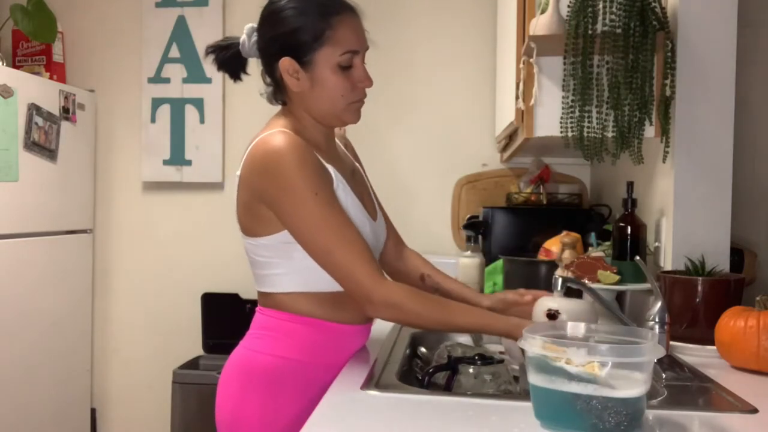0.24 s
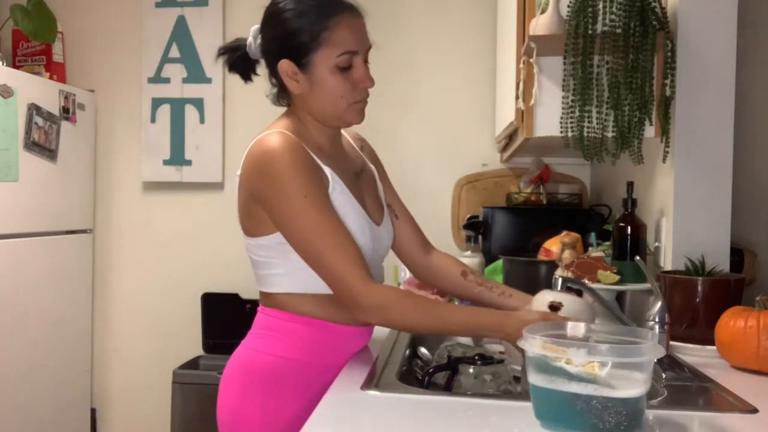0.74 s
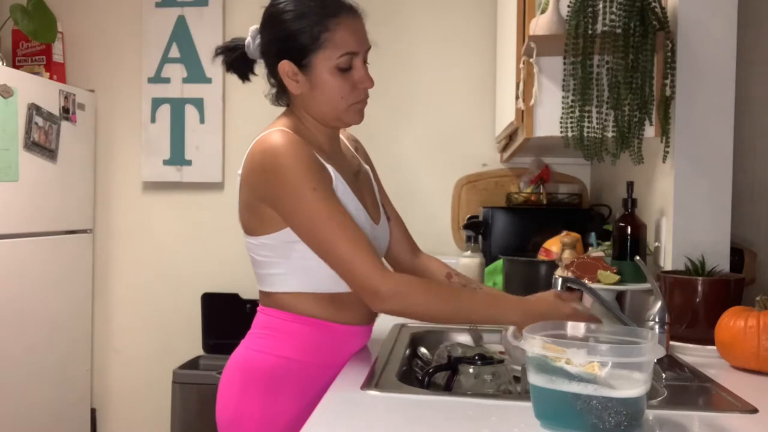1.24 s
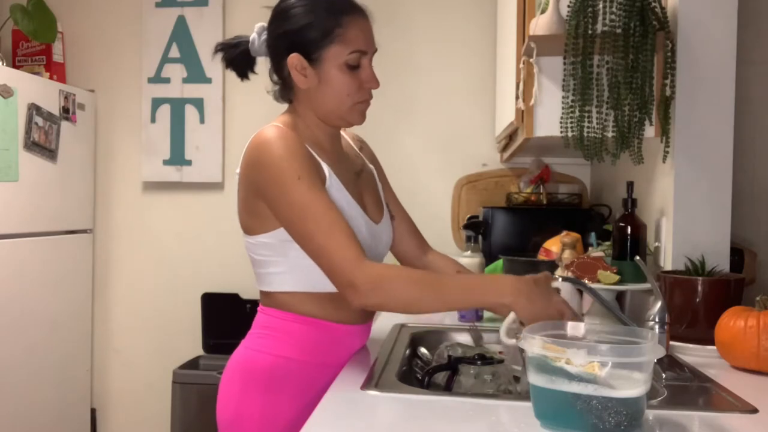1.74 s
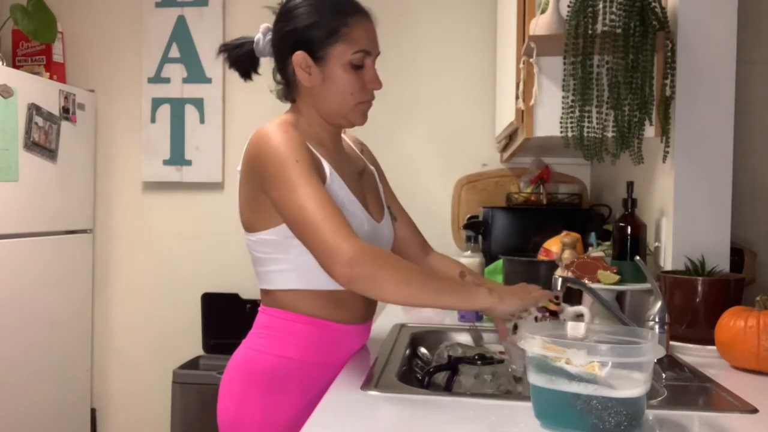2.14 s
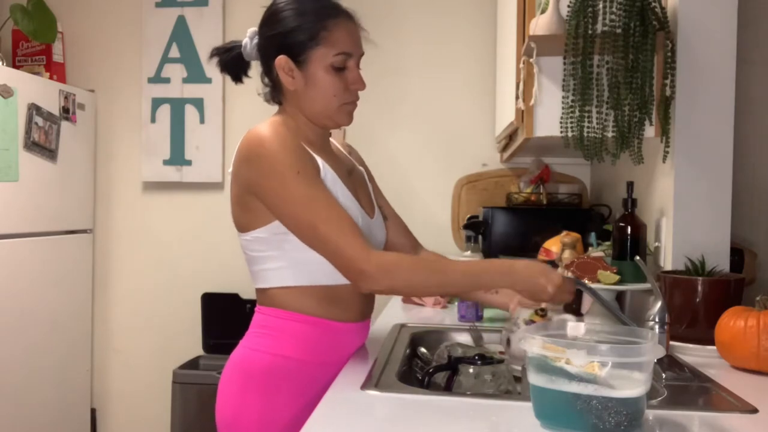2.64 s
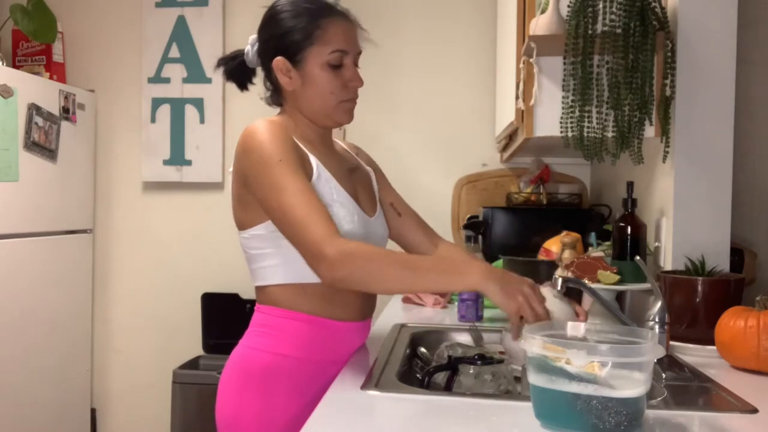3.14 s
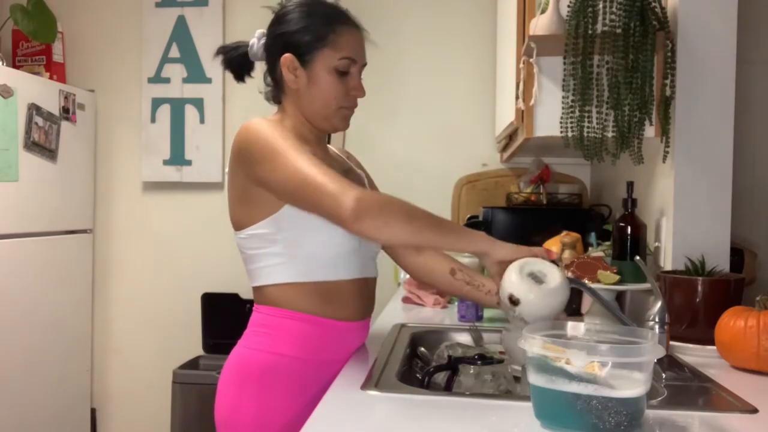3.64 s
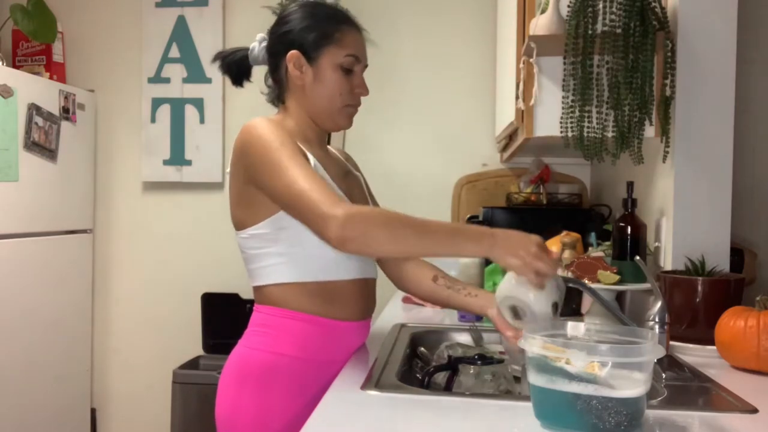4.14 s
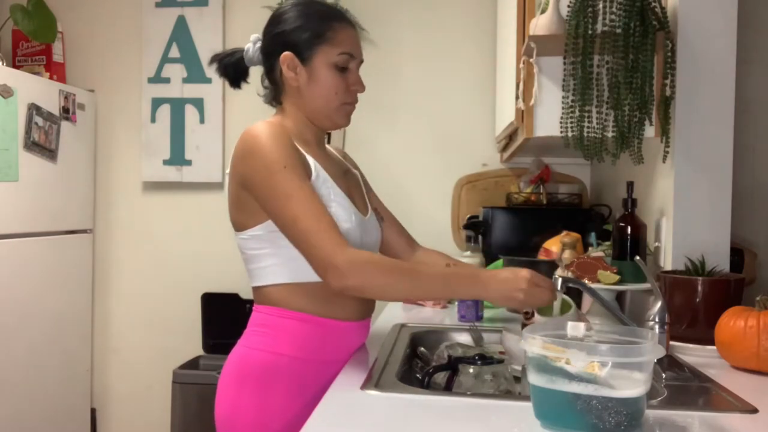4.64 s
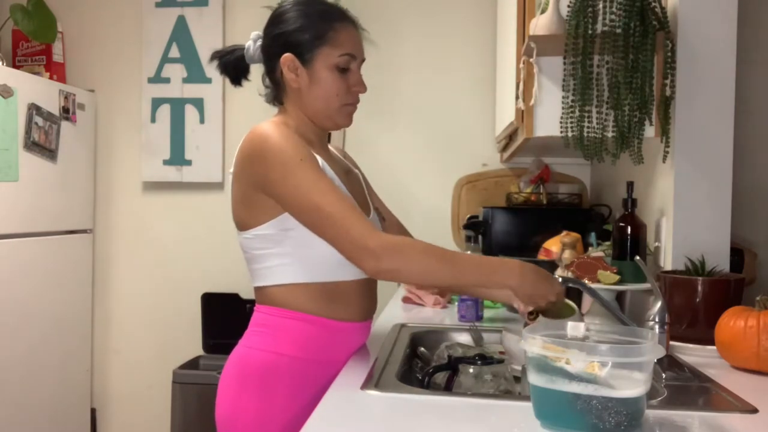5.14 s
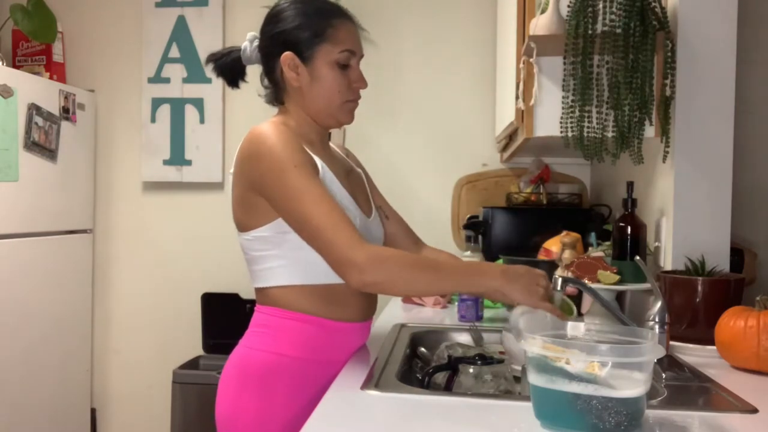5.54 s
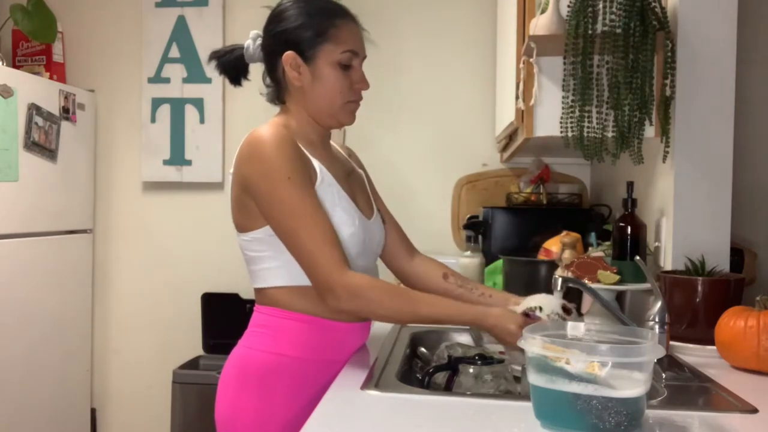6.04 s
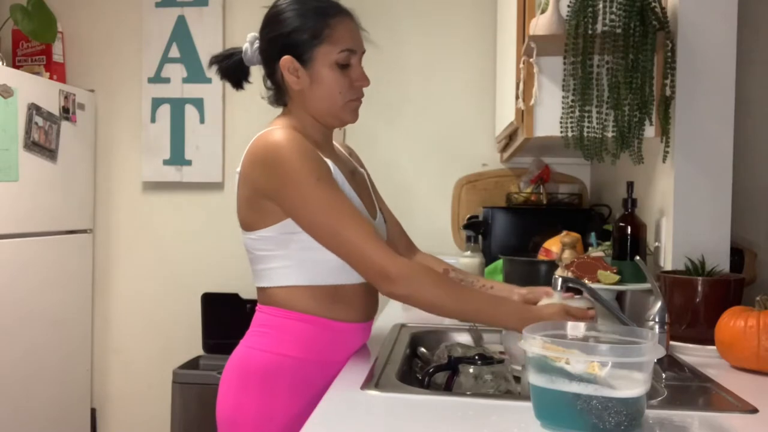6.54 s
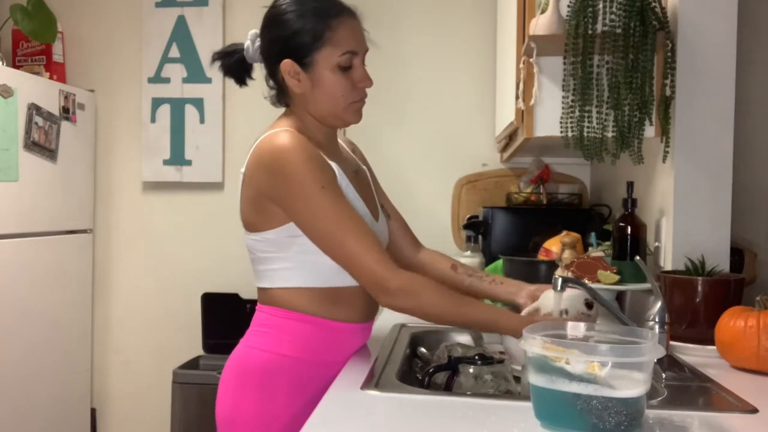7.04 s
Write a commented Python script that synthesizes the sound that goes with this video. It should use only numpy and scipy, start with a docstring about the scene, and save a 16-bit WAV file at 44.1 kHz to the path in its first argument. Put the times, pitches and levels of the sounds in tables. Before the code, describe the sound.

A small kitchen with short, diffuse echoes, heard in stereo from a metre or two, the sink slightly right. A thin, quiet tap hiss runs throughout. At 0 s a dish clink is already ringing with a water slosh; a strong clang of plate, glass and steel basin comes at 0.4 s. Until about 3 s, irregular damped clinks of plate, bowl, mug and glass mix with bright cutlery ticks, hollow basin knocks and deep cabinet thumps, with a dense bright cluster near 1.7, a splash near 2.1 and hard knocks around 2.4-2.7. From 3 to 4.6 s there is a lull: hiss, tiny rising drip notes, soft wet rubs and very faint knocks. A firm knock and clink at 4.7 restart sparser activity, with clusters near 5.0-5.3 and 5.8-6.0, where water sloshes again. Then mostly isolated dull knocks at 6.3, 6.8 and 7.0, and a last drip.

```python
"""Crockery is rinsed by hand in a steel kitchen sink, to the right of a phone a metre or two away.
From the start plate, bowl, mug, glass and cutlery ring as sums of decaying modes under gritty contacts,
knocks excite basin and cabinet modes, water sloshes as uneven noise and bubbles, and a thin tap hisses.
Past three seconds a lull brings dripping bubble notes and soft rubs; then sparser clinks and knocks resume.
Direct sound and diffuse echoes smear each blow for about a third of a second in the small kitchen."""
import sys
import numpy as np
from scipy import signal
from scipy.fft import rfft, irfft, next_fast_len
from scipy.io import wavfile
from scipy.ndimage import uniform_filter1d

SR = 44100
rng = np.random.default_rng(int(sys.argv[2]) if len(sys.argv) > 2 else 0)


def natural_amplitude(level_db):
    """Convert a level in decibels to a linear amplitude factor, elementwise."""
    exponent = np.asarray(level_db, float) / 20
    return 10 ** exponent


def inscribe(sig):
    """Save sig as 16-bit PCM at rate SR to the path in sys.argv[1].

    A 1-D sig is mono; a 2-D sig holds one channel per row.
    Samples are clipped to [-1, 1] before scaling.
    """
    pcm = np.round(np.clip(np.atleast_2d(sig).T, -1, 1) * 32767)
    wavfile.write(sys.argv[1], SR, pcm.astype(np.int16))


N = 321489  # samples in the scene
SPAN = 32768  # samples in the spectrum of one blow

# modes of the wooden cabinet under the basin: (frequency [Hz], relative level [dB], t60 [s])
CABINET_MODES = [(55, -38.5, 0.81), (70.8, -11.5, 0.72), (73, -28, 0.087), (103.3, -5.5, 0.21),
                 (125.4, -15, 0.86), (170.3, 0.5, 0.11), (194, -1.5, 0.095), (242.6, 4, 0.11),
                 (267, -6, 0.13), (341, -14, 0.22)]


def level(x, db):
    """Root-mean-square scaling: brings a signal to a given rms level."""
    return x * natural_amplitude(db) / np.sqrt(np.mean(x ** 2))


def band(x, hz, width):
    """Second-order resonance: a gentle band-pass with gain 1 at its centre."""
    return signal.lfilter(*signal.iirpeak(hz, hz / width, fs=SR), x)


def walk(rate):
    """Slow random modulation: chance values at a given rate, smoothed by a moving average, rms 1."""
    k = int(SR / rate)
    steps = np.repeat(rng.standard_normal(N // k + 1), k)
    return level(uniform_filter1d(steps, k)[:N], 0)


def hertz(size):
    """Frequency axis of a real spectrum, shifted 1 Hz to keep clear of zero."""
    return np.arange(size // 2 + 1) * SR / size + 1


def favour(hz, width):
    """Resonance response: complex gain of a broad resonance, 1 near its centre."""
    f = hertz(SPAN)
    return 1 / (1 + 1j * (f / hz - hz / f) * hz / width)


def decay(t, t60):
    """Exponential damping: the amplitude falls 60 dB in t60."""
    return np.exp(-np.log(1000) * t / t60)


def ring(modes, rise_s=1e-5):
    """Modal superposition: spectrum of a struck object's free decay, whose waveform peaks at 1."""
    t = np.arange(SPAN // 2) / SR
    y = sum(natural_amplitude(db) * np.sin(2 * np.pi * hz * t) * decay(t, t60) for hz, db, t60 in modes)
    y = y * (1 - np.exp(-t / rise_s)) ** 2
    return rfft(y / np.abs(y).max(), SPAN)


def contact(chatter_s, clean_s):
    """Excitation force: a sudden touch, then gritty rubbing that takes more of the energy the longer it is."""
    t = np.arange(SPAN // 4) / SR
    chatter_s = max(chatter_s, 1e-3)
    grit = rng.standard_normal(len(t)) * natural_amplitude(1.42 * rng.exponential(size=len(t)))
    push = grit * np.exp(-t / chatter_s)
    rub_share = chatter_s / (chatter_s + clean_s)  # of the energy
    push *= np.sqrt(rub_share / np.sum(push ** 2))
    push[0] = np.sqrt(1 - rub_share)
    return rfft(push, SPAN)


def add(track, s, x):
    """Linear superposition at time s; a blow before zero is already ringing."""
    i = int(s * SR)
    x = x[:, max(-i, 0):N - i]
    track[:, max(i, 0):max(i, 0) + x.shape[1]] += x


def coloured(spectrum):
    """Spectral shaping: noise filtered to a (frequency [Hz], level [dB]) curve, rms 1."""
    hz, db = np.transpose(spectrum)
    size = next_fast_len(N)
    gain = natural_amplitude(np.interp(np.log(hertz(size)), np.log(hz), db))
    return level(irfft(rfft(rng.standard_normal(size)) * gain, size)[:N], 0)


def crockery():
    """Coupled impact: each clink excites the modes of both pieces, under a dry broadband clack."""
    # two pieces meet: (time [s], one piece, its level [dB], other piece, its level [dB], chatter [s])
    clinks = [(-0.006, "glass", -18.5, "plate", -13.5, 0.053), (0.1573, "mug", -24, "glass", -23.5, 0.085),
              (0.404, "plate", -13.5, "glass", -16.5, 0.014), (0.411, "mug", -16.5, "bowl", -29, 0.013),
              (0.5553, "glass", -17, "mug", -22.5, 0.0088), (0.5788, "glass", -28, "mug", -33.5, 0.0067),
              (0.684, "plate", -15, "glass", -22, 0.0075), (0.7111, "glass", -37, "plate", -43, 0.036),
              (0.897, "plate", -25, "glass", -34, 0.012), (1.097, "plate", -17.5, "glass", -27.5, 0.0043),
              (1.2624, "glass", -21.5, "bowl", -36, 0.0066), (1.3481, "glass", -20, "plate", -21.5, 0.028),
              (1.603, "plate", -17.5, "bowl", -22.5, 0.013), (1.6823, "plate", -20, "glass", -17, 0.078),
              (1.736, "bowl", -8, "plate", -17, 0.0093), (1.738, "glass", -14.5, "mug", -19.5, 0.0077),
              (1.757, "glass", -15, "mug", -21.5, 0.0076), (2.0374, "glass", -27.5, "mug", -45, 0.009),
              (2.0924, "glass", -19, "plate", -26, 0.0046), (2.332, "glass", -38, "plate", -36.5, 0.018),
              (2.3685, "glass", -29.5, "bowl", -35, 0.023), (2.4122, "glass", -31, "plate", -37, 0.0082),
              (2.461, "glass", -29.5, "plate", -30.5, 0.011), (2.602, "bowl", -16.5, "glass", -28, 0.0032),
              (2.7806, "glass", -24.5, "mug", -32.5, 0.015), (2.8434, "glass", -34, "mug", -47, 0.015),
              (2.9404, "glass", -38, "mug", -45, 0.017), (4.679, "plate", -25, "glass", -29, 0.041),
              (4.9134, "plate", -39, "bowl", -47.5, 0.0056), (5.053, "glass", -35.5, "mug", -43, 0.013),
              (5.28, "mug", -30.5, "glass", -32, 0.043), (5.337, "glass", -23.5, "mug", -34, 0.015),
              (5.8389, "plate", -26, "glass", -40, 0.0096), (5.972, "mug", -23.5, "glass", -33, 0.0034)]
    # modes of each piece: (frequency [Hz], relative level [dB], t60 [s])
    plate_modes = [(1760, -17, 0.044), (1792, 1, 0.035), (1824, -16, 0.18), (1857, -23, .15),
                   (1964, -30.5, 0.13), (2025, -12, 0.094)]
    bowl_modes = [(2430, 0, .22), (3790, -15, .14), (3980, -13, .1), (4780, -13, .13), (5520, -14, .12),
                  (6020, -11, .16), (12560, -11, .16)]
    mug_modes = [(1055, -14, .2), (2765, 0, .26), (4280, -8, .16), (7320, -20, .18), (11900, -14, .15)]
    glass_modes = [(2660, -4, .04), (2810, -4, .05), (2878, 0, .12), (2930, -3, .1), (2985, -3, .06),
                   (3080, -3, .06), (3200, -6, .04)]
    pieces = {"plate": plate_modes, "bowl": bowl_modes, "mug": mug_modes, "glass": glass_modes}
    # wet glaze cushions the touch, so the ring swells in
    rings = {name: ring(modes, rise_s=0.0007) for name, modes in pieces.items()}
    clack_db, clack_hz = 12.5, 2220  # over the ring of the first piece
    clack = natural_amplitude(clack_db) * favour(clack_hz, 1.1 * clack_hz) ** 2
    blows = []
    for s, one, db, other, other_db, chatter_s in clinks:
        pair = natural_amplitude(db) * (rings[one] + clack) + natural_amplitude(other_db) * rings[other]
        blows.append((s, contact(chatter_s, clean_s=0.06) * pair))
    return blows


def cutlery():
    """Modal selection: the spot struck favours some short steel modes, under a bright scratch and glint."""
    # ticks and scrapes: (time [s], level [dB], favoured frequency [Hz], chatter [s])
    ticks = [(-0.006, -12.5, 4670, 0.025), (0.16, -20, 3120, 0.051), (0.403, -22, 3540, 0.016),
             (0.5477, -21.5, 7600, 0.027), (0.685, -26.5, 4260, 0.021), (0.8964, -32.5, 4400, 0.014),
             (1.095, -26, 4710, 0.046), (1.26, -25.5, 4600, 0.012), (1.348, -23.5, 4170, 0.014),
             (1.6054, -23.5, 3740, 0.035), (1.684, -19.5, 4100, 0.033), (1.7336, -11.5, 5540, 0.008),
             (2.0342, -30.5, 4280, 0.013), (2.0919, -15, 2950, 0.021), (2.3336, -31, 5560, 0.018),
             (2.3685, -28, 5560, 0.024), (2.6035, -21, 4000, 0.0057), (2.7797, -26.5, 3440, 0.017),
             (4.6804, -37, 3830, 0.02), (5.2814, -30, 3140, 0.0098), (5.3288, -27.5, 4000, 0.025),
             (5.9609, -28.5, 4130, 0.0092)]
    # steel modes: (frequency [Hz], relative level [dB], t60 [s])
    steel_modes = [(3540, 10, 0.011), (3886, 9.5, 0.041), (4400, 12, 0.0043), (4557, 2, 0.016),
                   (4930, 5, 0.013), (5560, -47, 0.051), (6580, 11, 0.016), (7210, 6, 0.085)]
    steel = ring(steel_modes) + natural_amplitude(21) * favour(2000, 7100)  # ring and scratch
    glint = favour(11500, 7000) ** 2
    glint_db, glint_slope = -2, 0.29  # glint of a 0 dB tick; dB per dB of tick
    blows = []
    for s, db, hz, chatter_s in ticks:
        body = natural_amplitude(db) * (0.89 + 3 * favour(hz, 0.036 * hz)) * steel
        body = body + natural_amplitude(glint_db + glint_slope * db) * glint
        blows.append((s, contact(chatter_s, clean_s=0.0027) * body))
    return blows


def basin():
    """Modal selection: the spot struck favours some basin modes, while the cabinet below thumps."""
    # knocks: (time [s], ring level [dB], favoured frequency [Hz], thump level [dB], chatter [s])
    knocks = [(-0.006, -17.5, 1300, -29.5, 0.024), (0.159, -21, 1300, -41, 0.024),
              (0.404, 1.5, 436, -19.5, 0.026), (0.41, -12.5, 1500, -24, 0.037),
              (0.474, -13, 1080, -24.5, 0.0079), (0.601, -22.5, 1060, -34, 0.0087),
              (1.261, -33, 1260, -62, 0.046), (1.586, -19, 444, -18, 0.035),
              (1.698, -21, 1050, -22.5, 0.017), (1.741, -15, 970, -36, 0.024),
              (2.035, -26, 1090, -56, 0.018), (2.09, -31, 1060, -28.5, 0.056),
              (2.207, -21.5, 990, -38, 0.005), (2.338, -29, 1230, -60, 0.06), (2.416, -12, 610, -26, 0.011),
              (2.461, -13.5, 912, -26.5, 0.0059), (2.659, -6, 860, -58, 0.009),
              (2.68, -9.5, 825, -23, 0.012), (2.789, -23, 930, -39, 0.065), (2.942, -41, 450, -36, 0.014),
              (4.267, -41, 659, -39.5, 0.053), (4.328, -29.5, 600, -43, 0.1),
              (4.678, -10, 810, -21, 0.0064), (4.698, -14, 670, -20.5, 0.011),
              (4.912, -27, 670, -45, 0.032), (5.04, -19.5, 720, -30, 0.0092),
              (5.092, -19, 565, -26.5, 0.008), (5.265, -20, 690, -34, 0.05),
              (5.314, -14.5, 710, -26.5, 0.04), (5.812, -40, 1070, -48, 0.026),
              (5.839, -10, 1010, -26, 0.019), (5.887, -24, 1060, -34, 0.018),
              (5.961, -28, 1060, -30.5, 0.07), (6.308, -40, 450, -14, 0.015),
              (6.79, -14.5, 476, -32.5, 0.017), (6.958, -31.5, 740, -36, 0.011),
              (7.06, -30.5, 624, -52, 0.014)]
    # basin modes: (frequency [Hz], relative level [dB], t60 [s])
    basin_modes = [(376, -10, 0.052), (436, -2, 0.31), (445, -23, 0.044), (542.5, 9, 0.14),
                   (610, -28, 0.079), (670, -4, 0.11), (707, 9, 0.11), (741, -12, 0.094), (869, 3.5, 0.17),
                   (902, 11.5, 0.068), (982, 2.5, 0.094), (1010, 17.5, 0.041), (1111, 18.5, 0.043),
                   (1046, 9.5, 0.091), (1210, 9, 0.092), (1220, 7, 0.23), (1500, -45, 0.26),
                   (1590, -35, 0.13)]
    steel = ring(basin_modes)
    thump_hz = 225
    thump = favour(thump_hz, 1.3 * thump_hz) ** 2 * ring(CABINET_MODES)
    blows = []
    for s, ring_db, hz, thump_db, chatter_s in knocks:
        crack = natural_amplitude(15.5) * favour(1.34 * hz, 1.33 * hz)
        body = natural_amplitude(ring_db) * (favour(hz, 1.03 * hz) ** 2 * steel + crack)
        blows.append((s, contact(chatter_s, clean_s=0.0031) * (body + natural_amplitude(thump_db) * thump)))
    return blows


def bubbles(count):
    """Bubble resonance: scattered small bubbles, each a few damped cycles rising in pitch."""
    t = np.arange(1024) / SR
    when, pitch, size = rng.random((count, 3)).T
    hz = 349.3 * 7. ** pitch[:, None]
    grains = size[:, None] ** 3 * np.sin(2 * np.pi * hz * t * (1 + 8 * t)) * np.exp(-hz * t / 7.6)
    out = np.zeros(N + len(t))
    starts = (when * N).astype(int)[:, None]
    np.add.at(out, starts + np.arange(len(t)), grains)
    return level(out[:N], 0)


def water():
    """Turbulent excitation: uneven splashes and bubbles over the low modal rumble of the cabinet."""
    # water moved by the hands: (time [s], slosh level [dB])
    slosh_curve = [(0.0, -34.5), (0.24, -49.5), (0.47, -59), (1.2, -64), (1.3, -50), (1.67, -55),
                   (1.9, -83), (2.11, -38), (2.27, -50), (2.88, -47.5), (3.1, -64.5), (4.101, -76),
                   (4.3, -58), (4.55, -78), (5.26, -51), (5.7, -78), (5.9, -40.5), (6.15, -57),
                   (6.681, -70), (6.96, -50), (7.29, -66)]
    slosh_db = np.interp(np.arange(N) / SR, *np.transpose(slosh_curve))
    drops = rng.standard_normal(N) * natural_amplitude(2.13 * rng.exponential(size=N))
    splashes = level(band(drops, 800, 1500) * natural_amplitude(3 * walk(25)), 0)
    slosh = level(splashes + bubbles(count=900), 0)
    rumble = signal.fftconvolve(rng.standard_normal(N), irfft(ring(CABINET_MODES)))[:N]
    rumble_db, rumble_slope = -28, 0.62  # under a 0 dB slosh; dB per dB of slosh
    return slosh * natural_amplitude(slosh_db) + level(rumble, 0) * natural_amplitude(rumble_db + rumble_slope * slosh_db)


def tap():
    """Stationary noise: tap hiss and room tone in sum and difference, with a slight level flutter."""
    # alike at the two ports: (frequency [Hz], relative spectral level [dB])
    mid_spectrum = [(30, -3), (59, 10), (127, -8), (252, 6.5), (400, -4.5), (780, -1), (1540, 4),
                    (6700, 3.5), (11000, 7.5), (13000, 11.5), (16000, 1)]
    # opposed at the two ports: (frequency [Hz], relative spectral level [dB])
    side_spectrum = [(30, -12), (245, -20), (650, -14.5), (913, -20), (1810, -9.5), (5000, -11.5),
                     (8300, -5.5), (12000, 0.5), (16000, -8)]
    mid = natural_amplitude(-48.5 + 0.71 * walk(14)) * coloured(mid_spectrum)
    side = natural_amplitude(-45.5 + 0.29 * walk(12)) * coloured(side_spectrum)
    return np.array([mid + side, mid - side])


def kitchen():
    """Room response: direct sound reaches the right port first, then diffuse echoes, alike in the bass."""
    # reverberation time: (frequency [Hz], t60 [s])
    reverb_times = [(60, 0.57), (250, 0.42), (1000, 0.18), (2000, 0.31), (4000, 0.35), (12000, 0.13)]
    t = np.arange(SPAN // 2) / SR
    hzs, t60s = np.transpose(reverb_times)
    tail = 0
    for hz in 45 * 2. ** np.arange(9):
        mid, side = (band(rng.standard_normal(len(t)), hz, 0.59 * hz) for _ in range(2))
        fade = decay(t, np.interp(np.log(hz), np.log(hzs), t60s))
        tail = tail + fade * (mid + min(hz / 510, 0.8) * side * np.array([[1], [-1]]))
    tail = tail * np.minimum(t / 0.008, 1)  # first walls answer after a few ms
    tail *= natural_amplitude(-4.5) / np.sqrt(np.sum(tail ** 2) / 2)  # energy relative to the direct sound
    left_lag_s, left_db = 0.00012, -1.5
    left = np.exp(-2j * np.pi * hertz(SPAN) * left_lag_s)
    direct = np.array([left, np.ones_like(left)])
    return natural_amplitude([[left_db], [0]]) * (direct + rfft(tail, SPAN))


def booms():
    """Low-mode excitation: knocks also shake the cabinet's lowest modes into a deep boom."""
    # deep part of knocks: (time [s], level [dB])
    shakes = [(0.16, -32.5), (0.474, -22.5), (0.6, -33.5), (1.719, -27.5), (2.098, -28.5), (2.45, -19.5),
              (2.739, -27), (2.942, -36), (4.7, -33), (4.919, -38.5), (5.042, -29), (5.298, -39),
              (5.813, -48), (5.989, -23), (6.801, -35.5), (6.95, -31.5)]
    boom_hz = 76.5
    boom = favour(boom_hz, 2.47 * boom_hz) ** 2 * ring(CABINET_MODES)
    return [(s, contact(chatter_s=0.029, clean_s=0.0015) * natural_amplitude(db) * boom) for s, db in shakes]


def drips():
    """Bubble resonance: each drop sounds a damped note that rises a little as it fades."""
    # single drops: (time [s], level [dB], starting frequency [Hz], t60 [s])
    drops = [(3.267, -47, 550, 0.084), (3.677, -45.5, 1593, 0.052), (4.061, -46, 883, 0.043),
             (4.211, -48, 1400, 0.052), (4.252, -48, 1900, 0.04), (4.35, -47, 1370, 0.05),
             (4.395, -46, 2150, 0.04), (6.677, -50, 1324, 0.03), (7.037, -43.5, 1770, 0.065)]
    t = np.arange(SPAN // 2) / SR
    blows = []
    for s, db, hz, t60 in drops:
        note = np.sin(2 * np.pi * hz * t * (1 + 0.19 * t)) * decay(t, t60)
        blows.append((s, rfft(natural_amplitude(db) * note, SPAN)))
    return blows


def rubs():
    """Friction noise: wet hands and crockery slide along the basin, swelling and dying away."""
    # (start [s], length [s], level [dB], favoured frequency [Hz])
    slides = [(3.869, 0.063, -42, 2360), (4.222, 0.24, -44, 900), (5.217, 0.18, -40.5, 1500),
              (5.946, 0.066, -46.5, 3000)]
    blows = []
    for s, length_s, db, hz in slides:
        t = np.arange(SPAN // 2) / SR / length_s  # share of the slide
        grit = rng.standard_normal(len(t)) * natural_amplitude(2.35 * rng.exponential(size=len(t)))
        swell = np.sin(np.pi * np.minimum(t, 1)) ** 2
        blows.append((s, natural_amplitude(db) * favour(hz, 1.1 * hz) * rfft(grit * swell, SPAN)))
    return blows


def scene():
    """Convolution with room responses: successive blows take nine spots in turn, each with its own echoes."""
    spots = [kitchen() for _ in range(9)]
    water_path = irfft(spots[0])[:, :SPAN // 2]
    out = signal.fftconvolve(water()[None], water_path, axes=1)[:, :N] + tap()
    blows = crockery() + cutlery() + basin() + booms() + drips() + rubs()
    for k, (s, blow) in enumerate(blows):
        add(out, s, irfft(blow * spots[k % len(spots)]))
    return out


def band_limit(x):
    """A steep low-pass at the top of the band."""
    return signal.sosfilt(signal.butter(12, 16680, fs=SR, output="sos"), x)


def record(dry):
    """Stereo processing and band limits: fixed notches thin the sum near 9 kHz and difference near 14 kHz."""
    sum_notch = signal.iirnotch(9050, 9050 / 5080, fs=SR)  # centre [Hz], centre over width
    difference_notch = signal.iirnotch(14200, 14200 / 9800, fs=SR)
    mid = signal.lfilter(*sum_notch, dry[0] + dry[1])
    side = signal.lfilter(*difference_notch, dry[0] - dry[1])
    stereo = np.array([mid + side, mid - side]) / 2
    # the deepest bass and the top drop away
    stereo = signal.sosfilt(signal.butter(4, 45, "high", fs=SR, output="sos"), stereo)
    stereo = signal.sosfilt(signal.ellip(6, 0.5, 50, 15900, fs=SR, output="sos"), stereo)
    return band_limit(stereo)


dry = scene()
out = record(dry)
inscribe(out)
```